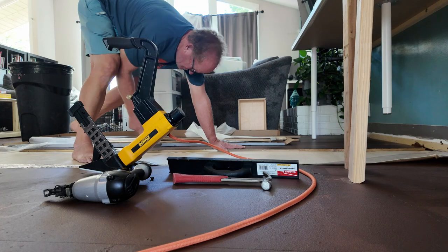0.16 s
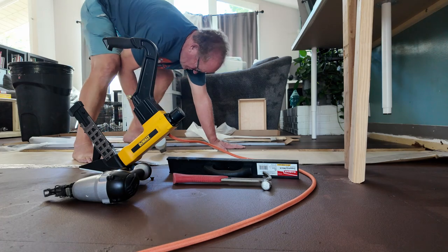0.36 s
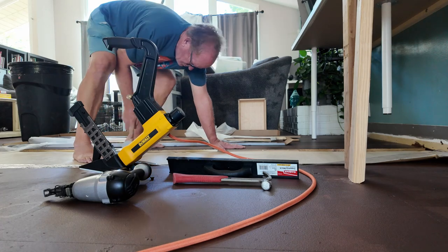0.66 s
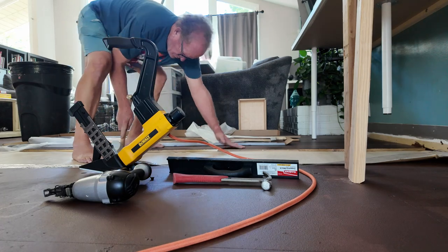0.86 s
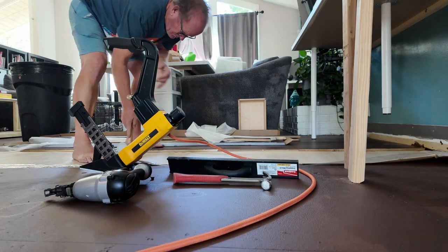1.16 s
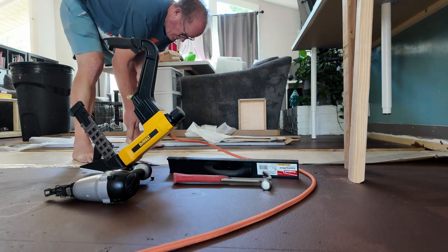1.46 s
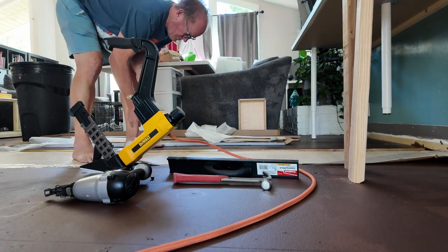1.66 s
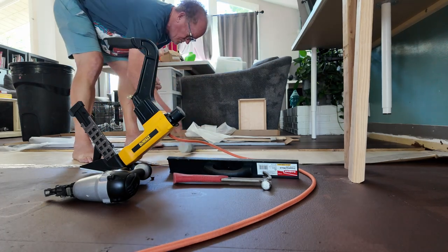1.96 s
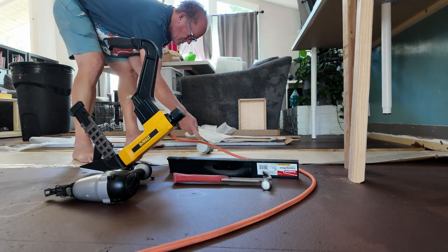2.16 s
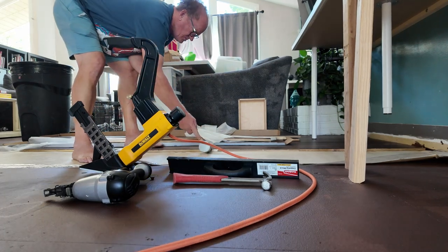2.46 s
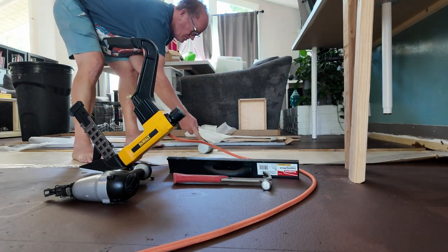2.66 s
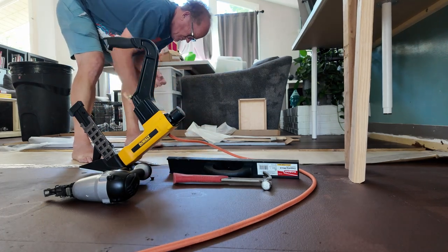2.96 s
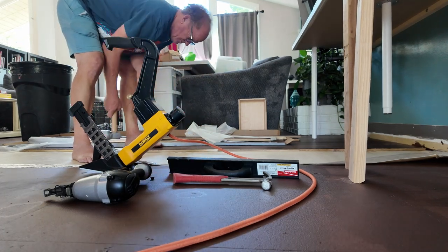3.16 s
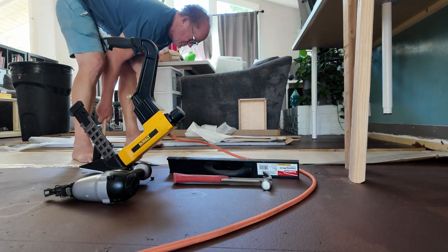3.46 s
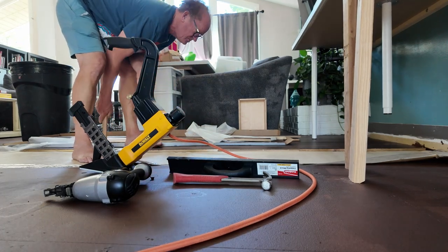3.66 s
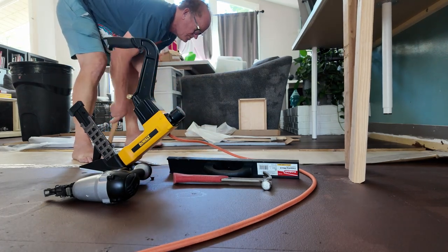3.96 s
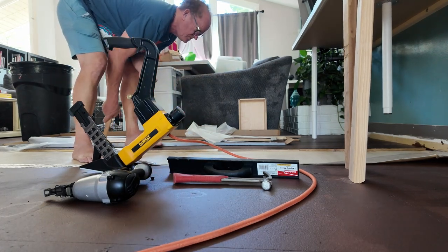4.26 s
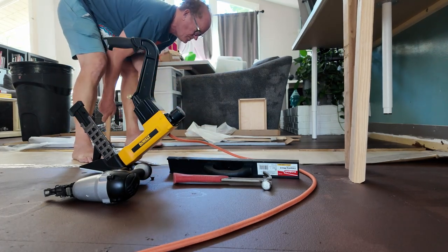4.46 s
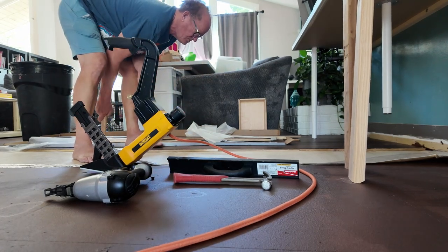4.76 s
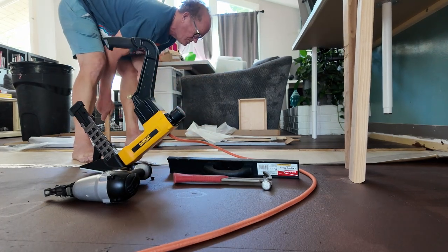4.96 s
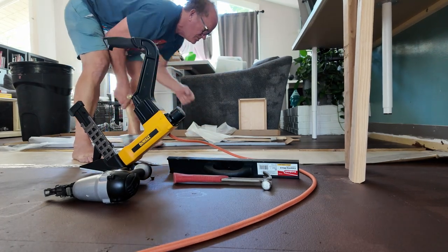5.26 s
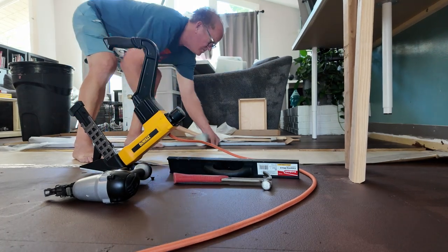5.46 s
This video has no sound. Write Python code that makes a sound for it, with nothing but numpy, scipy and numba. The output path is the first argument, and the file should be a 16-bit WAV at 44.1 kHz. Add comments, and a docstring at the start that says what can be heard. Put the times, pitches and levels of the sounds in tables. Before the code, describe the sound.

Flooring work in a furnished room. Feet and boards scuff softly, with faint bumps and tiny gritty ticks, then from about one second a rubber mallet strikes floorboards in loud, irregular woody knocks. Scuffs fill some gaps, and a softer blow falls at the end. A phone on the floor a few metres away squashes each hit and lets the short room tail swell back.

```python
"""First feet and boards scuff softly, three faint blows fall, and two small grit ticks follow (noise bursts).
From 1.1 to 5 s a rubber mallet knocks floorboards together: noisy contacts ring the boards and fill the room,
among scuffs and faint swishes of the swung mallet (rasping, hissing noise) and one louder tick. An air hose
leak (a thin noise band) swells near 3.75 s and again at the end, where a softer blow falls. The house hums
throughout (low shaped noise). A phone lies on the floor a few metres away; its limiter pulls each blow down
and lets the tail swell back."""
import sys
import numpy as np
from scipy import signal
from scipy.fft import rfft, irfft
from scipy.io import wavfile
from scipy.ndimage import uniform_filter1d
from numba import njit

SR = 44100
rng = np.random.default_rng(int(sys.argv[2]) if len(sys.argv) > 2 else 0)


def transcribe(u):
    """Save the signal u as a 16-bit wav file named by the first command-line argument.

    u: samples, shape (n,) or (channels, n), limited to [-1, 1]; the rate is SR.
    q: integer samples, one column per channel.
    """
    v = np.clip(np.atleast_2d(u).T, -1, 1)
    q = np.round(v * 32767).astype(np.int16)
    wavfile.write(sys.argv[1], SR, q)


N = 246502

# Blows, bumps and footfalls: t/s, level/dB (SPREAD_DB below the direct energy), then thud/dB, boom/dB,
# knock/dB, crack/dB over the body of the board; contact/ms, tail length as a share of the room's,
# extra clack near 2 kHz/dB
BLOWS = [(0.423, -41, -4, 3, -20, 9, 2.7, 1.3, 0.1), (0.441, -31, 0, -13, 4, 9, 5.8, 0.8, -1),
         (0.506, -29, -6.5, -13, 2, 3.5, 5, 1.3, 1.5), (1.107, -4.5, -14.5, 0.5, 2, 7, 4.6, 1.14, 3.5),
         (1.436, -1, -10.5, 1.5, -4.5, -8, 2.9, 1.014, -1.5), (1.48, -9, -2.4, 3.5, 4, -5, 3.46, 0.95, 2.5),
         (2.214, -24, 37, 16, 6, -3, 3.9, 0.73, 5), (2.412, -4, -12, -3.5, -0.5, 2.5, 5.35, 1.03, -0.5),
         (2.71, -5, -8.5, -0.3, -4, -9, 3.07, 0.87, 1), (3.499, -4, 21, 20.5, -5, -0.5, 7.1, 0.83, -8.5),
         (4.039, -17, 38, 30, 0, 5.5, 8.8, 1.2, -6), (4.095, -5, -15.5, -6.5, -3, -9.5, 1.9, 0.91, 2.5),
         (4.467, -6, -7.5, 0.5, 8.5, 4.5, 5.6, 1.43, 6.5),
         (4.767, -1.15, -2.5, -11.5, 3, -3, 3.07, 1.03, 1.2), (4.996, -0.1, -8, -11, 0, -4, 4.1, 1.04, 0),
         (5.573, -21.5, 10.5, -4, 0, -16, 3.9, 0.29, -6)]
SPREAD_DB = 20
# Borders of the colour bands, from thud (lowest) through boom, body and knock to crack (top four): f/Hz
COLOUR_EDGES_HZ = [60, 130, 300, 650, 1400, 2500, 4500, 8000, 15000]
# Change of the crack in each of its four bands: level/dB
CRACK_SLOPE_DB = [-0.5, -7.5, -13, -24]
# Broad resonances of boards and joists: f/Hz, width/Hz, lift/dB (each blow takes a random share of the lift)
BOARD_RESONANCES = [(67, 78, 8), (184.3, 89, 9), (258.4, 21, 5), (428, 120, 4.5), (562.5, 40, -0.5),
                    (752, 27, 0.5), (808, 30, -4), (990, 46, 0.5), (1250, 70, 0.5), (1490, 240, -4.5),
                    (1908, 46, 4.5), (2134, 58, 1), (2570, 80, 0), (3000, 190, 2.5), (3540, 310, 4),
                    (3650, 530, 4.5), (4510, 320, 4.5)]
# Echo of the furnished room: f/Hz, time to fall by 60 dB/s, level the furniture leaves/dB
ROOM_DECAY = [(69, 0.41, 2), (151.4, 0.47, -1.5), (294, 0.48, 1.3), (603, 0.49, 0.73), (1150, 0.54, 1.1),
              (2350, 0.5, -0.5), (4900, 0.44, -1), (9400, 0.41, -3.5)]
ROOM_DB = -0.07  # echo against the direct blow
# Likeness of left and right in sound from all around: f/Hz, correlation from -1 to 1
LEFT_RIGHT_LIKENESS = [(60, 0.99), (130, 0.99), (290, 0.97), (640, 0.83), (1410, 0.58), (3100, -0.16),
                       (6820, -0.067), (15000, 1)]
# Feet and boards sliding, and faint swishes of the swung mallet just before some blows:
# t/s at full level, rise/s and fall/s over 20 dB, hold/s, level/dB, hiss over the rasp/dB, rasp centre f/Hz
SCUFFS_AND_SWISHES = [(0.008, 0.06, 0.15, 0.015, -40, -42, 1413),
                      (0.23, 0.12, 0.11, 0.012, -50.5, -7, 1550),
                      (0.43, 0.017, 0.055, 0.061, -43.5, -3.5, 1400),
                      (0.65, 0.074, 0.17, 0.03, -53, 0.5, 1600), (0.89, 0.52, .15, .14, -60.5, -0.5, 1250),
                      (1.098, 0.033, 0.011, 0.0024, -46, -5, 2050),
                      (1.2, 0.06, 0.16, 0.052, -29, -27, 1750),
                      (2.224, 0.043, 0.25, .03, -63.5, -2.5, 1100),
                      (2.398, 0.044, 0.0098, 0.009, -47.5, 0, 1850), (2.69, .06, .01, 0.02, -62, 6, 1800),
                      (3.05, 0.19, .16, 0.075, -48, -7, 1650), (3.7, .1, 0.15, .28, -64.5, -5.5, 1400),
                      (4.06, .02, .01, 0.034, -64, 4.5, 1800),
                      (4.466, 0.0081, 0.0052, 0.0045, -33.5, -5.5, 1410),
                      (4.571, 0.094, 0.12, 0.02, -28, -44, 1773), (4.75, .06, .01, .015, -60.5, 5.5, 1800),
                      (5.49, 0.22, .1, 0.13, -53, -1, 1500)]
# Small dry ticks of grit and tool: t/s, peak level/dB, centre f/Hz
TICKS = [(0.553, -46, 11000), (0.648, -43, 5600), (2.4035, -24, 3800)]
# Colour of the house sound, before its overall level is set: f/Hz, level per Hz/dB
HOUSE_COLOUR = [(15, -63.5), (25, -29.5), (64, 2), (123, -7.5), (149, -11), (242, -11.5), (451, -25.5),
                (545, -22), (659, -36), (936, -35), (4370, -45.5), (5140, -38), (5880, -51.5), (16000, -55)]
HOUSE_DB = -48
# Air hose leak, before its random waver: t/s, level/dB
LEAK_LEVEL = [(0, -91), (1.0, -79.5), (2.3, -76.5), (3.3, -70.5), (3.55, -81.5), (3.75, -61), (4.05, -66.5),
              (4.3, -80), (5.2, -92), (5.42, -57), (5.59, -56)]
LEAK_HZ, LEAK_WIDTH_HZ = 5120, 220
LEFT_LAG_S, LEFT_DB = 0.0001, -0.4  # left against right: delay of the direct blow, level of everything
TOP_HZ = 16100


def mallet():
    """Each blow starts its own ringing, and overlapping sounds add up."""
    size = 2 ** 15
    out = np.zeros((2, N + size))
    for start_s, level_db, *how in BLOWS:
        at = int(start_s * SR)
        out[:, at:at + size] += undb(level_db + SPREAD_DB) * blow(*how, size)
    return out[:, :N]


def blow(thud_db, boom_db, knock_db, crack_db, contact_ms, tail_scale, clack_db, size):
    """A rattling contact shakes the boards, whose resonances colour the direct sound and its echo."""
    hz = np.fft.rfftfreq(size, 1 / SR)

    # the rattle sets when things arrive; head and wood set the colour
    x = np.arange(size) / SR / (max(contact_ms, .3) / 1000)
    rattle = rfft(rng.standard_normal(size) * x ** 3 * np.exp(-3 * x))  # strongest at the contact time
    smooth_power = uniform_filter1d(np.abs(rattle) ** 2, size=91)
    rattle = irfft(rattle / np.sqrt(smooth_power), size)
    rattle = rfft(rattle[:size // 8], size)

    edges = np.array(COLOUR_EDGES_HZ)
    colour_db = np.r_[thud_db, boom_db, 0, knock_db, crack_db + np.array(CRACK_SLOPE_DB)]
    colour_db[4] += clack_db
    band_centres = np.sqrt(edges[1:] * edges[:-1])
    db = on_log(hz, np.c_[band_centres, colour_db - 10 * np.log10(np.diff(edges))])  # spread over each width
    db = db - 14 * np.log2(np.maximum(70 / np.maximum(hz, 1), 1))  # boards radiate little deep bass
    db = db - 12 * np.log2(np.maximum(hz / 11500, 1))  # the rubber head gives little at the very top
    # each spot on the floor wakes the resonances in another mix
    wake = rng.uniform(0.13, 1.61, len(BOARD_RESONANCES))
    for share, (centre_hz, width_hz, lift_db) in zip(wake, BOARD_RESONANCES):
        db = db + share * lift_db / (1 + ((hz - centre_hz) / (width_hz / 2)) ** 2)
    wood = causal(db)
    wood = wood / np.sqrt(np.mean(np.abs(wood) ** 2))

    # the phone's body breaks the plain delay between its ports in the treble: at most a quarter turn
    turn = np.minimum(2 * np.pi * hz * LEFT_LAG_S, np.pi / 2)
    direct = np.exp(-1j * turn * np.array([[1], [0]]))
    echo = undb(ROOM_DB) * room(size, tail_scale)
    sound = irfft(wood * rattle * (direct + echo), size)
    return sound * np.minimum(1, np.linspace(3, 0, size))  # fade over the last third


def room(size, tail_scale):
    """Echo spectrum from one spot: builds up over the first walls, then dies at its own pace per pitch range."""
    t, noise = np.arange(size) / SR, rfft(diffuse(size))
    octave = np.log2(np.maximum(np.fft.rfftfreq(size, 1 / SR), 1))
    centres = np.log2([row[0] for row in ROOM_DECAY])
    tail = 0
    for share, (_, t60_s, level_db) in zip(np.eye(len(centres)), ROOM_DECAY):
        part = irfft(noise * np.interp(octave, centres, share), size)
        tail = tail + part * undb(level_db - 60 * t / (t60_s * tail_scale))
    tail = tail * (1 - np.exp(-(t / 0.0039) ** 2))
    return rfft(tail / np.sqrt(np.sum(tail ** 2) / 2))


def scuffs_and_swishes():
    """Friction and stirred air: a rasp around a moving resonance and a fine hiss, grainy in level."""
    t = np.arange(N) / SR
    gain = np.array([undb(row[4]) * swell(t, *row[:4]) for row in SCUFFS_AND_SWISHES]) + 1e-12
    hiss_db, centre_hz = np.array(SCUFFS_AND_SWISHES)[:, 5:].T
    hz = centre_hz @ gain / gain.sum(axis=0)  # louder rows pull the resonance harder

    tone = np.array([svf(svf(v, hz, 1.7), hz, 1.7) for v in diffuse(N)])
    broad = band(band(diffuse(N), 270, 3600), 270, 3600)
    rasp = unit(unit(broad) + undb(-3.5) * unit(tone)) * undb(1.8 * walk(90))

    low_hiss = band(band(diffuse(N), 3300, 6200), 3300, 6200)
    high_hiss = band(diffuse(N), 5800, 12000)
    hiss = unit(unit(low_hiss) + undb(-3.5) * unit(high_hiss)) * undb(2.1 * walk(220))
    return gain.sum(axis=0) * rasp + undb(hiss_db) @ gain * hiss


def swell(t, full_s, rise_s, fall_s, hold_s):
    """A gain that grows, holds and dies away at a steady number of dB per second."""
    before = (full_s - t) / max(rise_s, .002)
    after = (t - full_s - hold_s) / max(fall_s, .002)
    return undb(-20 * np.maximum(0, np.maximum(before, after)))


def ticks():
    """Grit and tool give noise bursts of a few milliseconds around one pitch."""
    out, t = np.zeros((2, N)), np.arange(1024) / SR
    for start_s, peak_db, hz in TICKS:
        puff = diffuse(len(t)) * t * np.exp(-t / .0012)
        burst = band(puff, hz / 1.4, min(hz * 1.4, SR / 2.2))
        at = int(start_s * SR)
        out[:, at:at + len(t)] += undb(peak_db) * burst / np.abs(burst).max()
    return out


def house():
    """Low rumble and faint hiss, wavering by half octave, and the thin noise of the leaking air hose."""
    colour = undb(on_log(np.fft.rfftfreq(N, 1 / SR), HOUSE_COLOUR))
    noise = irfft(rfft(diffuse(N)) * colour, N)
    hum = 0
    for hz in 25 * 2 ** np.arange(0, 9.1, .5):
        hum = hum + band(noise, hz, hz * np.sqrt(2)) * undb(1.3 * walk(3.9))
    leak = unit(band(diffuse(N), LEAK_HZ - LEAK_WIDTH_HZ / 2, LEAK_HZ + LEAK_WIDTH_HZ / 2))
    leak_db = np.interp(np.arange(N) / SR, *np.transpose(LEAK_LEVEL)) + 1.8 * walk(12)
    return unit(hum) * undb(HOUSE_DB) + leak * undb(leak_db)


def diffuse(size):
    """Stereo white noise from all around: alike in the bass, mostly unrelated in the treble."""
    likeness = np.clip(on_log(np.fft.rfftfreq(size, 1 / SR), LEFT_RIGHT_LIKENESS), -1, 1)
    shares = np.sqrt([(1 + likeness) / 2, (1 - likeness) / 2])
    mid, side = rfft(rng.standard_normal((2, size))) * shares
    return irfft(np.array([mid + side, mid - side]), size)


def walk(rate):
    """Random levels, `rate` of them per second, with the steps smoothed twice."""
    k = int(SR / rate)
    steps = np.repeat(rng.standard_normal(N // k + 1), k)
    return 0.91 * uniform_filter1d(uniform_filter1d(steps, k), k)[:N]


def causal(db):
    """Filter that responds as early as it can (minimum phase), from a gain in dB per rfft bin."""
    c = irfft(db * np.log(10) / 20)
    c[1:len(c) // 2] *= 2
    c[len(c) // 2 + 1:] = 0
    return np.exp(rfft(c))


@njit
def svf(x, hz, q):
    """Band-pass whose centre moves."""
    y, b, l = np.empty(len(x)), 0., 0.  # b and l: band and low memories
    for i in range(len(x)):
        g = np.tan(np.pi * hz[i] / SR)
        v = (b + g * (x[i] - l)) / (1 + g * (g + 1 / q))
        b, l, y[i] = 2 * v - b, l + 2 * g * v, v / q
    return y


def band(x, lo_hz, hi_hz):
    """Band-pass that uses only past sound."""
    return signal.sosfilt(signal.butter(2, [lo_hz, hi_hz], "band", fs=SR, output="sos"), x)


def on_log(hz, table):
    """Read a table of f/Hz and value on a log-frequency axis."""
    f, v = np.transpose(table)
    return np.interp(np.log(np.maximum(hz, 1)), np.log(np.maximum(f, 1)), v)


def undb(db):
    """Turn dB into a plain gain."""
    return 10 ** (np.asarray(db) / 20)


def unit(x):
    """Scale to an average (RMS) level of 1."""
    return x / np.sqrt(np.mean(x ** 2))


@njit
def follow(x, attack, release):
    """Level follower: quick up, slow down."""
    e, out = 0., np.empty(len(x))
    for i in range(len(x)):
        e += (x[i] - e) * (attack if x[i] > e else release)
        out[i] = e
    return out


def scene():
    """All sources add up in the air; the left side is a little quieter."""
    balance = undb(np.array([[LEFT_DB], [-LEFT_DB]]) / 2)
    return (mallet() + scuffs_and_swishes() + ticks() + house()) * balance


def record(dry):
    """Bass cut, a limiter that recovers during each tail, soft clipping and the top cut-off."""
    x = signal.sosfilt(signal.butter(3, 62, "high", fs=SR, output="sos"), dry)
    threshold, ratio, attack_s, release_s = undb(-12.5), 2.6, .006, .06
    level = follow(np.abs(x).max(axis=0), 1 / (attack_s * SR), 1 / (release_s * SR))
    gain = np.minimum(1, (threshold / (level + 1e-9)) ** (1 - 1 / ratio))
    x = np.tanh(x * gain)
    return signal.sosfilt(signal.ellip(10, .2, 70, TOP_HZ, fs=SR, output="sos"), x)


dry = scene()
out = record(dry)
transcribe(out)
```